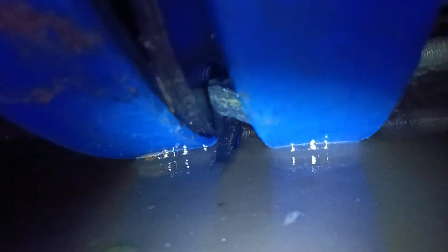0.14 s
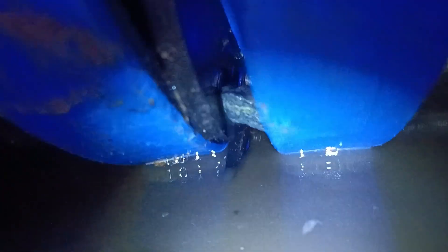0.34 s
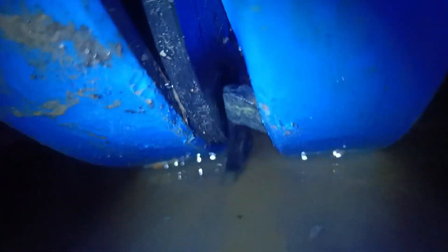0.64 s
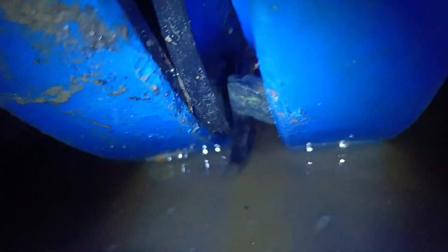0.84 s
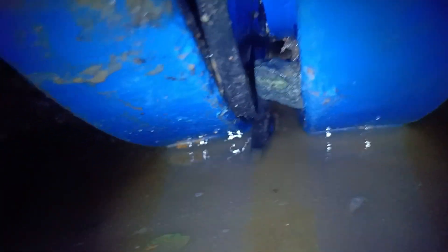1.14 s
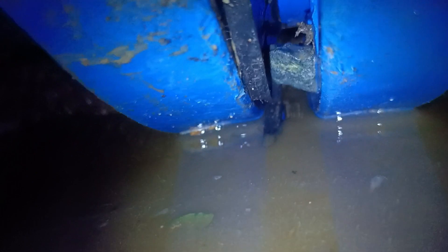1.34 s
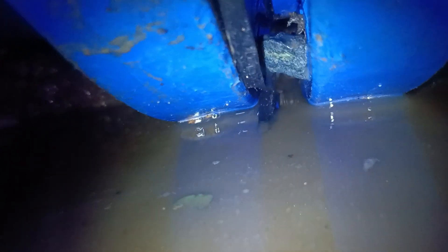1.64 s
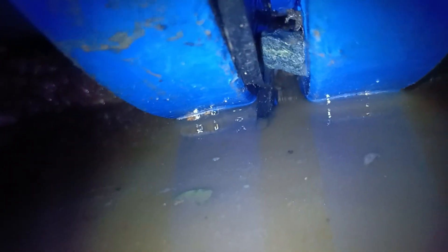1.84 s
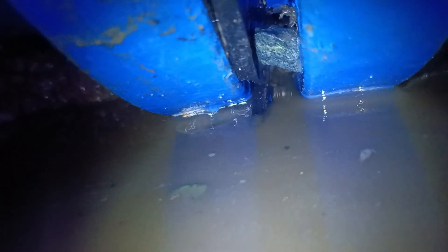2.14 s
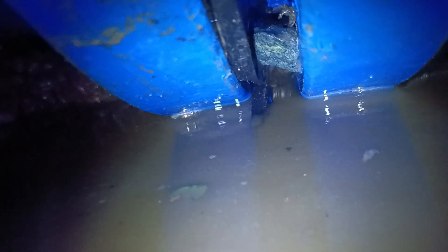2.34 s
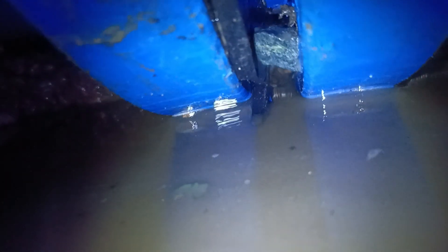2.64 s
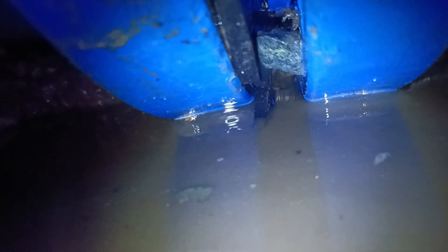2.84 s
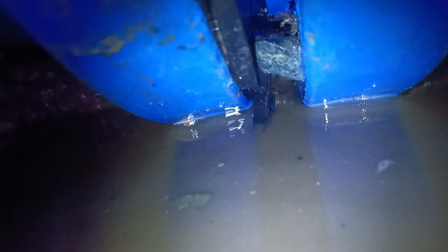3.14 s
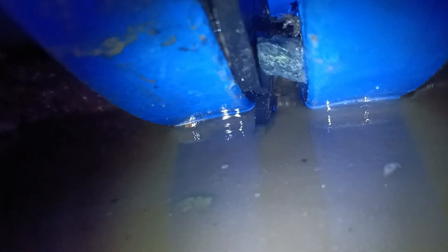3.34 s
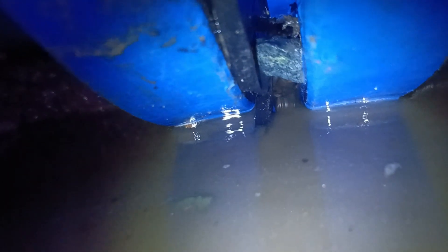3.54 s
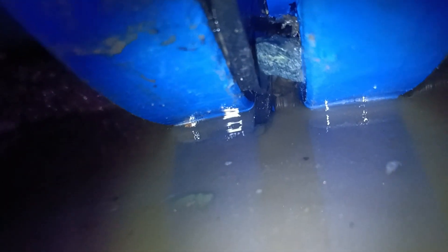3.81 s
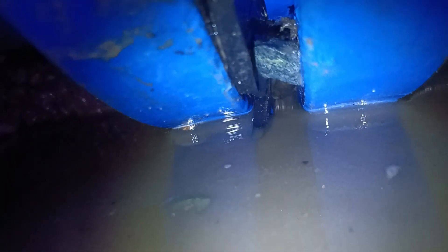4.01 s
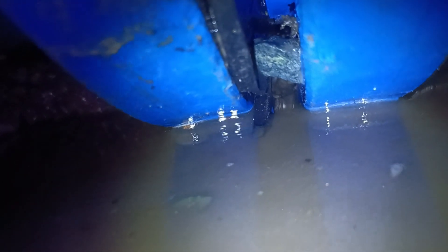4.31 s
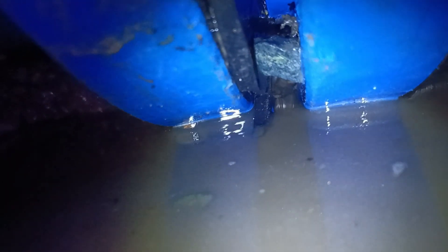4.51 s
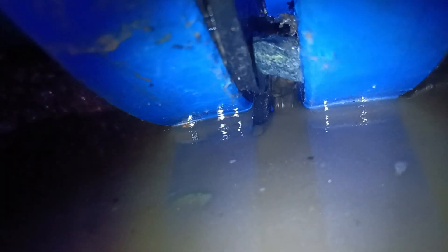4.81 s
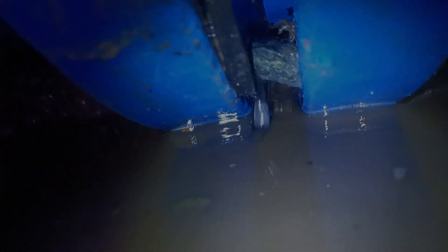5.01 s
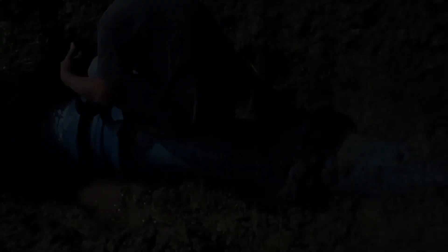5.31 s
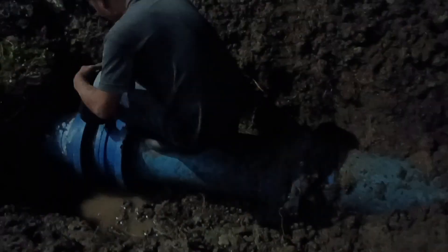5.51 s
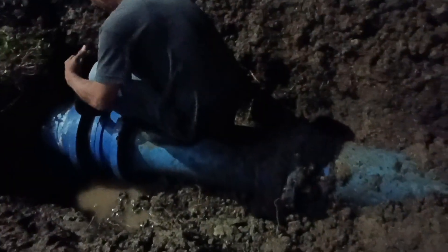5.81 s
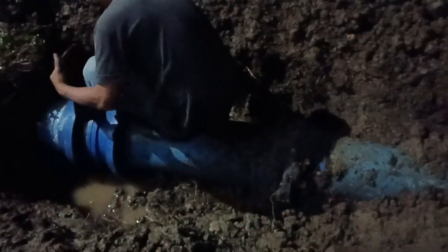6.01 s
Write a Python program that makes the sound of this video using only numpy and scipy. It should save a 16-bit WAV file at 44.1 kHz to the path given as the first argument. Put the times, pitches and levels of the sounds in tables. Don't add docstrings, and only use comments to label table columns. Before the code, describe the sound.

Very close to the microphone, a leaking plastic pipe joint in a muddy trench spits water and air in irregular bursts. Gulps, hollow bubble pops and fizzy spray ride over a low flow rumble, with air pockets thumping and drips between spurts. It stops abruptly for half a second of silence, then a softer water rush is heard from the trench edge with a very faint, high insect whistle.

```python
import sys
import numpy as np
from scipy import signal
from scipy.fft import rfft, irfft
from scipy.io import wavfile
from scipy.ndimage import uniform_filter1d, minimum_filter1d, map_coordinates

SR = 44100
rng = np.random.default_rng(int(sys.argv[2]) if len(sys.argv) > 2 else 0)


def inscribe(sig):
    pcm = np.round(np.clip(np.atleast_2d(sig).T, -1, 1) * 32767)
    wavfile.write(sys.argv[1], SR, pcm.astype(np.int16))


def volts(x):
    e = np.asarray(x, float) / 20
    return 10 ** e


N = 271656
CUT_S, BACK_S = 5.188, 5.702

# [t/s, level/dB]
EDGE_LEVEL = [
    (5.7, -35),
    (6.16, -35),
]
# [f/Hz, level/dB per Hz]
EDGE_SPECTRUM = [(25, -32), (55, -2.5), (140, 4.5), (400, -3.5), (1300, -7), (3000, -16), (4300, -32.5),
                 (6800, -36), (7800, -29), (8800, -35), (10500, -40), (15300, -50)]
# [t/s, f/Hz, level/dB]
INSECT_WHISTLE = [
    (5.703, 11700, -63),
    (5.74, 11800, -62),
    (5.765, 11750, -63),
    (5.815, 11350, -66.5),
    (5.84, 10600, -74),
    (5.86, 10900, -70),
    (5.89, 10800, -80),
]
# [t/s, level/dB]
FLOW_LEVEL = [(0.0, -23), (2.78, -25.5), (2.83, -20.5), (3.24, -26), (3.38, -24.5), (3.47, -25.5),
              (4.1, -24), (4.16, -16.5), (4.47, -28), (4.55, -16.5), (4.97, -24), (5.19, -21.5)]
# [f/Hz, level/dB per Hz]
FLOW_SPECTRUM = [(20, -53), (45, -22), (75, -6), (92, 4.5), (115, -1.5), (155, -2.5), (200, -9.5),
                 (320, -9), (480, -54), (1500, -110)]
# [f/Hz, level/dB per Hz]
SEEP_SPECTRUM = [(200, -20), (330, 0), (600, -20), (1100, -23), (2700, -31), (3600, -52), (8000, -66),
                 (9350, -55), (10500, -64), (15500, -70)]
# [t/s, peak/dB, f/Hz]
DRIPS_HEARD = [(.5310, -16, 1790), (.7350, -16, 690), (.7770, -37, 2800), (.7990, -33, 1850),
               (.8954, -17, 1240), (.9300, -22, 1800), (1.0620, -16, 1920), (1.2000, -22, 660),
               (1.2400, -27, 720), (1.2800, -25, 1010), (1.2815, -22, 1760), (1.3440, -35, 2900),
               (1.8810, -29.5, 2550), (1.9230, -32, 1190), (1.9972, -17.5, 1310), (2.2400, -21, 1780),
               (2.2550, -21, 2550), (2.2770, -26, 2700), (2.9000, -18, 2670), (3.2630, -15, 1800),
               (3.8210, -17, 2630), (3.8663, -12, 2620), (3.9240, -15, 1500), (4.2900, -14, 1840),
               (4.4120, -16, 720), (4.8480, -30, 2000), (4.8720, -30, 2500), (4.8910, -32, 2700)]
# [t/s, mist level/dB]
WALL_TICKS = [(.7560, -58), (.7992, -55), (.8446, -59), (.8965, -52), (1.2532, -55), (1.2620, -58),
              (1.3070, -56), (1.3445, -56), (1.9666, -52), (1.9980, -50), (2.3531, -55), (4.8282, -57),
              (4.8470, -54), (4.8730, -55), (4.8906, -54), (4.9280, -58)]
# [t/s, peak/dB, f/Hz]
AIR_POCKETS = [(0.085, -21, 288), (0.285, -18, 248), (0.337, -15.5, 160.7), (0.34, -16, 235),
               (0.685, -17, 231), (0.91, -23, 103.4), (1.051, -16, 158), (1.092, -18.5, 225),
               (1.788, -19, 240), (1.84, -19.5, 166), (2.108, -16.5, 162), (2.815, -14, 287),
               (2.85, -15.5, 164), (3.33, -17, 229), (3.355, -11.5, 165), (3.465, -20.5, 154),
               (3.628, -13, 221), (3.783, -20, 288), (4.152, -21, 113.5), (4.208, -15.5, 258),
               (4.483, -14.5, 295), (4.55, -12, 153), (5.155, -11.5, 166.7)]
# [f/Hz, width/Hz, level/dB]
WALL_MODES = [(495, 225, -1.5), (700, 80.5, 2), (1007, 150, -13.5), (1240, 83, -8), (1450, 111, -11),
              (1607, 65, -10.5), (1800, 94, -4.5), (1980, 150, -7.5), (2188, 170, -4.5), (2384, 101, -6),
              (2620, 112, -2), (2867, 130, -6), (3048, 183, -9), (3450, 60, -18), (3950, 140, -28),
              (4852, 110, -30.5), (5393, 260, -32.5), (5890, 430, -37), (6673, 77, -36), (7350, 220, -38),
              (8193, 200, -28.5), (8740, 130, -24), (9370, 460, -20), (10600, 950, -29),
              (12500, 1200, -30.5), (14340, 1500, -34), (15200, 440, -37)]
# [f/Hz, width/Hz, depth/dB]
WALL_NODES = [(1124, 84, -20.5), (1680, 25.6, -12.5), (2125, 76, -13.5), (3425, 47, -24.5),
              (3670, 150, -14.5), (4400, 200, -6), (5350, 45, -16.5), (6290, 150, -7.5), (9830, 79, -8),
              (12300, 300, -8.5)]
# [t/s, peak/dB, f/Hz]
BUBBLE_POPS = [(0.1705, -8, 694), (0.2821, -11, 463), (0.5517, -5, 665), (0.5658, -10.5, 580),
               (0.5754, -12, 574), (0.6816, -5, 530),  (0.957, -7, 660), (1.0904, -3.5, 720),
               (1.1037, -3.5, 487), (1.1204, -9.5, 694),  (1.3729, -2.5, 790), (1.4324, -6.5, 710),
               (1.5834, -8.5, 477), (1.6798, -13, 700), (1.7492, -5.5, 700), (2.4494, -8.5, 534),
               (2.7464, -8.5, 700), (2.8226, -8.5, 474), (2.853, -9, 735), (2.9243, -4, 730),
               (2.9743, -1.5, 700), (3.0235, -8, 516), (3.0606, -7, 700), (3.0715, -9, 700),
               (3.1633, -11, 670), (3.3419, -10, 530), (3.4064, -3.5, 686), (3.4598, -7, 700),
                (3.5365, -7, 675), (3.6257, -9, 690), (3.6417, -7.5, 666), (3.6726, -8.5, 420),
               (3.7319, -5.5, 466), (3.7684, -9, 520), (3.7882, -8, 460), (3.8842, -6, 700),
               (3.9696, -12, 506), (3.9807, -9, 430), (4.0279, 1.5, 725), (4.0438, -4, 480),
               (4.0624, -8, 610), (4.2075, -4.5, 637), (4.2782, -2.5, 680), (4.3053, -5, 700),
               (4.3406, -5.5, 473), (4.436, -7, 680), (4.4518, -3.5, 554), (4.57, -6.5, 690),
               (4.5939, -9, 490), (4.6099, -7, 480), (4.7587, -4, 438), (4.9982, -5.5, 490),
               (5.0224, -7, 706), (5.1218, -6.5, 462),
               (0.0207, -6, 1300), (0.0989, -2.5, 1670), (0.1525, -4.5, 1240), (0.1698, -7, 1810),
               (0.188, -1, 2050), (0.3238, -10.5, 1800), (0.3438, -7, 1780), (0.3661, -1.5, 1900),
               (0.4077, 0.5, 1640), (0.4955, -1.5, 1700),  (0.5805, -7, 1800), (1.0319, 0, 1790),
               (1.121, -13, 1280), (1.4594, -6.5, 1680), (1.5952, -5, 1800), (1.622, -0.5, 1630),
               (1.6803, -5, 1980), (1.7027, -10, 1450), (2.0903, -1.5, 1450), (2.1996, -9, 1800),
               (2.406, -6, 1800), (2.4908, -7, 1300), (2.5306, -7.5, 1800), (2.5651, -7, 1920),
               (2.6921, -6.5, 1700), (2.865, -7, 1450), (2.9354, -9, 1800),  (3.0606, -8, 1750),
               (3.0715, -5.5, 1800), (3.113, -5.5, 1710), (3.244, 4.5, 1950), (3.351, -3, 1980),
               (3.472, -4.5, 1960), (3.5256, -4.5, 1360), (3.5721, -10, 1260), (3.6359, -5.5, 1980),
               (3.6463, -9, 1800), (3.802, -4.5, 1630), (3.8845, -8, 1360), (3.9572, -0.5, 1870),
               (4.0358, -4, 1690), (4.2296, -5, 1640), (4.2571, -8.5, 1260), (4.3229, -8.5, 1800),
               (4.377, -2.5, 1900), (4.5172, -7.5, 1920),  (4.626, -3.5, 1850), (4.6574, -5.5, 1740),
               (4.679, -9, 1870), (4.7086, -13, 1230), (4.779, -4.5, 1990), (5.0512, -4.5, 1540),
               (5.0644, -6, 1800), (5.1467, 1.5, 1980),
               (0.0213, -14, 2630), (0.1705, -3, 2720), (0.1835, 6, 2270), (0.3373, -6, 2720),
                 (0.346, -6, 2600), (0.364, -4.5, 2600), (0.4081, -4.5, 2740), (0.5523, -8.5, 2780),
                 (0.58, -0.5, 2440), (0.6797, -4.5, 2220), (1.0075, -8.5, 2620), (1.0283, -10.5, 2900),
                 (1.433, -5, 2620), (1.798, -9.5, 2620), (1.823, 1, 2760), (2.066, -1, 3200),
                 (2.1796, -7.5, 2620), (2.208, -4, 2550), (2.4065, -9, 2620), (2.4599, -4, 2410),
                 (2.4837, -5, 2360), (2.4915, -5, 2760), (2.5826, -4, 3030), (2.6667, -8.5, 2560),
                 (2.844, -5, 2550), (2.8518, -2.5, 2600), (2.8627, -5, 2720), (2.9256, -0.5, 2620),
                 (3.014, -4.5, 2190), (3.033, -2, 2750), (3.1985, -1.5, 3050), (3.243, -14, 2700),
                 (3.2646, -10, 2660), (3.324, -4, 2530), (3.3534, -5.5, 2560), (3.534, -10, 2800),
                 (3.6327, -3.5, 2720), (3.7878, -2, 2760), (3.9027, -7.5, 2540), (3.9562, -5, 2620),
                  (4.1271, -3.5, 2700), (4.2232, -4.5, 2620), (4.324, -4, 2360), (4.49, -8.5, 2680),
                 (4.6131, -5, 2900), (4.7516, -2, 2180), (4.7793, -10, 2360), (5.0506, -10, 2640),
               (0.648, -6.5, 544), (0.6567, -11.5, 686), (0.6696, -7.5, 690), (1.1275, -9.5, 540),
                (1.1918, -10, 3230), (1.453, -9, 700), (1.4523, -9.5, 2530), (1.4962, -11, 680),
                (1.5594, -10.5, 700), (1.6404, -8.5, 680), (1.7924, -9.5, 436), (2.0643, -9, 720),
                (2.1076, -9.5, 700), (2.7976, -7.5, 470), (2.8104, -7, 2570), (3.1523, -11.5, 680),
                (3.3287, -7, 424), (4.2192, -9.5, 2630), (4.2265, -8.5, 505), (4.3172, -7, 645),
                (4.4828, -9, 447), (4.5167, -11.5, 660),  (4.7664, -7, 735)]
# [f/Hz, life/cycles, swell/cycles]
RING_CYCLES = [(450, 0.86, 0.4), (750, 0.83, 0.42), (1300, 2.2, 0.64), (2000, 2.1, 1.1), (3000, 2.6, 1.4)]
# [t/s, peak/dB, f/Hz]
MIST_SQUIRTS = [(0.072, -20, 9200),  (0.1704, -13.5, 4940), (0.2542, -16, 9350), (0.277, -13, 6450),
                (0.3094, -25, 9310), (0.3376, -21, 4880), (0.5757, -15.5, 4300), (0.679, -19, 9250),
                (0.6883, -18.5, 9410), (0.7034, -22.5, 9350), (0.9572, -18, 9700), (0.982, -22.5, 9490),
                (1.088, -14.5, 8250),  (1.7938, -20.5, 8850), (2.092, -17.5, 9600), (2.437, -14, 4970),
                (2.4612, -17, 5760), (2.7355, -20, 9300), (2.805, -24, 10750), (3.0253, -18, 3940),
                (3.164, -18, 3980), (3.2995, -16, 3830), (3.3222, -16.5, 8140), (3.34, -17, 4050),
                (3.613, -20, 9500), (3.6754, -20, 3900), (3.7316, -19.5, 9500),  (4.1083, -17, 9300),
                (4.1962, -24, 9400), (4.3195, -17.5, 8660), (4.4522, -19.5, 8950), (4.4774, -22.5, 9500),
                (4.5962, -21, 9240), (4.735, -12, 6100), (5.1215, -21, 4000)]
# [t/s, length/s, level/dB, mist level/dB]
SPURTS = [(.076, 0.09, -25.5, -39.5), (0.255, 0.089, -20, -28.5), (0.422, 0.062, -26.5, -45),
          (0.648, 0.065, -17, -26), (0.937, 0.082, -22.5, -32), (1.102, 0.089, -20, -37.5),
          (1.370, 0.12, -21.5, -36), (1.555, 0.044, -23.5, -35), (1.628, 0.057, -18.5, -36),
          (1.744, 0.077, -20, -31), (2.045, 0.12, -27.5, -34), (2.422, 0.081, -20, -35.5),
          (2.523, 0.064, -22.5, -35.5), (2.639, 0.073, -20.5, -35.5), (2.727, 0.095, -24, -31),
          (2.801, 0.071, -17, -30), (2.912, 0.077, -23, -40), (2.975, 0.11, -18.5, -33.5),
          (3.069, 0.055, -19.5, -40.5), (3.287, 0.079, -18, -32.5), (3.431, 0.21, -20.5, -34),
          (3.674, 0.13, -20, -34), (3.943, 0.063, -20.5, -36.5), (4.035, 0.1, -22.5, -33),
          (4.271, 0.083, -25.5, -35), (4.319, 0.051, -15, -36), (4.455, 0.091, -20, -34),
          (4.563, 0.07, -16, -31.5), (4.695, 0.083, -15, -33), (4.983, 0.1, -19.5, -34)]
# [t/s, length/s, level/dB, mist level/dB]
MORE_SPURTS = [(0, 0.03, -23.5, -42), (0.046, 0.034, -23.5, -34.5), (0.169, 0.017, -16.5, -42),
               (0.229, .032, -30.5, -37), (0.339, 0.043, -18.5, -44), (0.487, 0.044, -21, -41),
               (0.548, 0.026, -19.5, -34), (0.626, .034, -26, -32.5), (0.71, 0.021, -19.5, -34),
               (0.913, .03, -42, -50), (1.024, 0.045, -39, -52.5), (1.072, 0.037, -19, -34),
               (1.526, 0.019, -24.5, -39.5), (1.72, .028, -27.5, -41.5), (1.824, 0.014, -20.5, -42),
               (2.017, 0.026, -32, -36.5), (2.167, 0.034, -16.5, -28), (2.234, 0.02, -30, -37.5),
               (2.401, 0.03, -22.5, -44), (2.599, 0.03, -25.5, -50.5), (3.148, 0.012, -19, -32),
               (3.192, 0.015, -22.5, -34), (3.234, 0.04, -25, -47), (3.398, 0.052, -31, -44),
               (3.859, 0.049, -26.5, -43.5), (4.189, 0.043, -19, -30), (4.405, 0.059, -27, -39.5),
               (4.542, .031, -39, -43), (4.961, 0.056, -25, -33.5), (5.101, 0.11, -24, -40)]


def unit(x):
    return x / np.sqrt(np.mean(x ** 2) + 1e-20)


def curves(rows):
    t_s, *cols = np.transpose(rows)
    return [np.interp(np.arange(N) / SR, t_s, col) for col in cols]


def wobble(rate_hz):
    knots = rng.standard_normal(int(N * rate_hz / SR) + 4)
    return map_coordinates(knots, [np.arange(N) * rate_hz / SR])


def rush(spectrum):
    f_hz, level_db = np.transpose(spectrum)
    f = np.fft.rfftfreq(N, 1 / SR)
    gain = volts(np.interp(np.log(f + 1), np.log(f_hz), level_db))
    return unit(irfft(rfft(rng.standard_normal(N)) * gain, N))


def band(x, lo_hz, hi_hz):
    return signal.sosfilt(signal.butter(4, [lo_hz, hi_hz], "band", fs=SR, output="sos"), x)


def scatter(t_s, rows):
    at = (np.asarray(t_s) * SR).astype(int)[:, None] + np.arange(rows.shape[1])
    return np.bincount(at.ravel(), rows.ravel(), N + SR)[:N]


def patchy(x, depth_db):
    z = signal.stft(x, nperseg=256)[2]
    field = uniform_filter1d(rng.standard_normal(z.shape), size=11, axis=0)
    field = uniform_filter1d(field, size=5, axis=1)
    return unit(signal.istft(z * volts(depth_db * unit(field)), nperseg=256)[1][:N])


def wall(size=8192):
    f = np.fft.rfftfreq(size, 1 / SR)
    power = sum(volts(db) ** 2 / (1 + (2 * (f - hz) / w) ** 2) ** 1.517 for hz, w, db in WALL_MODES)
    notches_db = sum(db / (1 + (2 * (f - hz) / w) ** 2) for hz, w, db in WALL_NODES)
    cepstrum = irfft(np.log(volts(10 * np.log10(power) + notches_db)), size)
    cepstrum[1:size // 2] *= 2
    cepstrum[size // 2 + 1:] = 0
    return irfft(np.exp(rfft(cepstrum)), size)[:size // 4]


def bubbles(f_hz, cycles, rise, size, swell=0.44):
    turns = np.asarray(f_hz)[:, None] * np.arange(size) / SR
    ring = np.sin(2 * np.pi * turns * (1 + rise * turns / cycles))
    return ring * np.exp(-turns / cycles) * (1 - np.exp(-turns / swell))


def swarm(rate_hz, lo_hz, hi_hz, cycles, spread_db, clump_db, size, body, rise=0.023):
    u = rng.random((int(rate_hz * CUT_S), 3))
    strength = volts(-spread_db * np.log(u[:, 2] + 1e-4))[:, None]
    rows = strength * bubbles(lo_hz * (hi_hz / lo_hz) ** u[:, 1], cycles, rise, size)
    x = scatter(u[:, 0] * CUT_S, rows) * volts(clump_db * wobble(45))
    x = band(signal.fftconvolve(x, body)[:N], 0.52 * lo_hz, 1.24 * hi_hz)
    return x / np.sqrt(np.abs(uniform_filter1d(x ** 2, 2200)) + 1e-9)


def popped(rows, cycles, snap_db, gain_db, rise=0.0053, swell=0.53):
    t_s, peak_db, f_hz = np.transpose(rows)
    ring = bubbles(f_hz, cycles, rise, size=900, swell=swell)
    snap = rng.standard_normal(ring.shape) * np.exp(-np.arange(ring.shape[1]) / (0.0012 * SR))
    source = ring + volts(snap_db) * band(snap, 200, 5800)
    heard = signal.fftconvolve(source, wall()[None], axes=1)
    return scatter(t_s, heard / np.abs(heard).max(1)[:, None] * volts(peak_db + gain_db)[:, None])


def insect():
    f_hz, level_db = curves(INSECT_WHISTLE)
    phase = 2 * np.pi * np.cumsum(f_hz + 25 * wobble(400)) / SR
    level = volts(level_db + 5 + 2.5 * wobble(73))
    partial = volts(-17 + 5 * wobble(30)) * np.sin(phase * 5 / 6)
    return level * (np.sin(phase) + partial) * (np.arange(N) / SR < INSECT_WHISTLE[-1][0])


def trench_edge():
    t = np.arange(N) / SR
    far_leak = volts(curves(EDGE_LEVEL)[0] + 0.46 + 1.5 * wobble(33)) * rush(EDGE_SPECTRUM)
    tick = volts(-46 - 60 * np.abs(t - 5.909) / 0.012) * band(rng.standard_normal(N), 980, 9000)
    return far_leak + insect() + tick


def flow_rumble():
    glugs = swarm(45, 83.0, 190, cycles=7.7, spread_db=-4.5, clump_db=-1.0, size=4000, body=[1])
    heave = volts(0.51 * wobble(47))
    return volts(curves(FLOW_LEVEL)[0]) * (volts(-7.0) * heave * rush(FLOW_SPECTRUM) + volts(-19.5) * glugs)


def seepage():
    trickle = volts(-38.0 + 4.5 * wobble(22.095)) * rush(SEEP_SPECTRUM)
    drips = popped(DRIPS_HEARD, 7.6, -10.5, 0.45, rise=0.04)
    sparse = swarm(70, 500, 3200, cycles=5, spread_db=3, clump_db=3, size=900, body=wall(), rise=0.03)
    return trickle + drips + volts(-54) * sparse


def thumps():
    t_s, peak_db, f_hz = np.transpose(AIR_POCKETS)
    return scatter(t_s, bubbles(f_hz, 4.5, 0.027, size=6000) * volts(peak_db - 0.5)[:, None])


def first_gulps():
    t_s, _, level_db, _ = np.transpose(SPURTS + MORE_SPURTS)
    f_hz = 678 * volts(0.52 * rng.standard_normal(len(t_s)))
    return np.transpose([t_s + 0.003056, level_db + 1.5, f_hz])


def single_bubbles():
    listed = BUBBLE_POPS
    f_hz, *laws = np.transpose(RING_CYCLES)
    lives, swells = [np.interp(np.transpose(listed)[2], f_hz, law)[:, None] for law in laws]
    return popped(listed, lives, -11, -0.22, swell=swells) + popped(first_gulps(), 1.2, -2.4, -5.5)


def crackle(rate_hz, spread_db):
    u = rng.random((int(rate_hz * CUT_S), 3))
    blows = volts(-spread_db * np.log(u[:, 1] + 1e-3)) * np.sign(u[:, 2] - 0.5)
    return unit(signal.fftconvolve(scatter(u[:, 0] * CUT_S, blows[:, None]), wall())[:N])


def squirts(rows, gain_db, dies_s):
    t_s, level_db = np.transpose(rows)[:2]
    t = np.arange(SR // 20) / SR
    return scatter(t_s, volts(level_db[:, None] + gain_db - 60 * t / dies_s) * (1 - np.exp(-t / 0.00068)))


def bursts(column, dies_s, swell_s=0.0052):
    dribble_db, dribble_s = -30, 0.22
    t, gain = np.arange(N) / SR, np.zeros(N)
    for row in SPURTS + MORE_SPURTS:
        start_s, length_s = row[:2]
        span = slice(int(start_s * SR), int((start_s + length_s + dribble_s) * SR))
        since = t[span] - start_s
        after = np.maximum(since - length_s, 0)
        fade = np.maximum(volts(-60 * after / dies_s), volts(dribble_db - 60 * after / dribble_s))
        opening = 1 - np.exp(-since / swell_s)
        gain[span] = np.maximum(gain[span], volts(row[column]) * fade * opening)
    return gain


def wet_spray():
    slosh = swarm(90, 146.5, 377, cycles=1.8, spread_db=3.5, clump_db=2.0, size=1500, body=[1])
    gurgle = swarm(260, 407.5, 968, cycles=1.5, spread_db=1.5, clump_db=2.5, size=700, body=wall())
    froth = swarm(1300, 916, 3310, cycles=2.94, spread_db=3.0, clump_db=6.5, size=400, body=wall())
    drops = band(crackle(350, spread_db=3.5), 300, 3900)
    slow = bursts(column=2, dies_s=0.07) * (volts(-10.0) * slosh + volts(-3.0) * gurgle)
    return slow + bursts(column=2, dies_s=0.091) * (volts(-2.5) * froth + volts(-9.5) * drops)


def fizzing(mist, beads, kick):
    fizz = volts(-2.5) * patchy(volts(-2.0) * mist + volts(-10.5) * beads, depth_db=3.8)
    fizz = fizz * volts(3 * wobble(95)) * (1 + 0.9 * kick)
    facing = np.clip(1 - np.arange(N) / SR / 1.1, 0, 1)
    return fizz + facing * (band(fizz, 9150, 9650) + band(fizz, 12400, 13200))


def mist_spray(singles):
    mist = swarm(14000, 3700, 16000, cycles=6, spread_db=1.8, clump_db=4, size=130, body=wall())
    beads = swarm(300, 3700, 12500, cycles=16, spread_db=2.2, clump_db=1, size=300, body=wall(), rise=0.004)
    kick = np.sqrt(np.abs(uniform_filter1d(singles ** 2, size=200)))
    fizz = fizzing(mist, beads, kick)
    thrown = bursts(column=3, dies_s=0.018, swell_s=0.0061) + squirts(MIST_SQUIRTS, -6.5, 0.035)
    fine = (thrown + volts(-39.5) * kick) * fizz
    coarse = volts(-13) * bursts(column=3, dies_s=0.091, swell_s=0.015) * band(fizz, 3700, 9840)
    idle = volts(-71.5 + 5.5 * wobble(90)) + squirts(WALL_TICKS, 1.5, 0.03)
    squirt_rings = popped(MIST_SQUIRTS, 12, -52.5, -2.5, rise=0.003)
    return fine + coarse + idle * (mist + volts(-14) * beads) + squirt_rings


def leak():
    singles = single_bubbles()
    return flow_rumble() + seepage() + thumps() + singles + wet_spray() + mist_spray(singles)


def scene():
    t = np.arange(N) / SR
    edge_s = 0.00043
    close = leak() * np.clip((CUT_S - t) / edge_s, 0, 1)
    far = trench_edge() * np.clip((t - BACK_S) / edge_s, 0, 1)
    return (close + far)[None]


def roll_off(x):
    return signal.sosfilt(signal.butter(12, 16470, fs=SR, output="sos"), x)


def record(dry):
    top_hz = 15450
    needed = np.minimum(1, 0.9 / (np.abs(dry) + 1e-9))
    held = dry * uniform_filter1d(minimum_filter1d(needed, size=121), size=61)
    over_hz = np.clip(np.fft.rfftfreq(2 * N, 1 / SR) - top_hz, 0, 900)
    kept = irfft(rfft(held, 2 * N) * volts(-over_hz / 12))[:, :N]
    return roll_off(kept)


dry = scene()
out = record(dry)
inscribe(out)
```